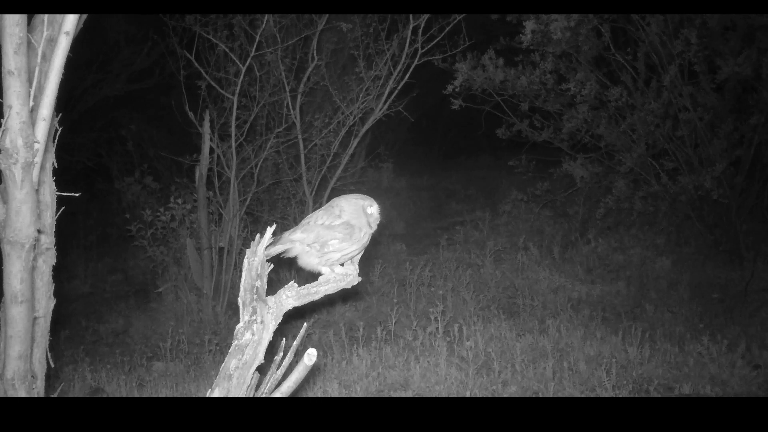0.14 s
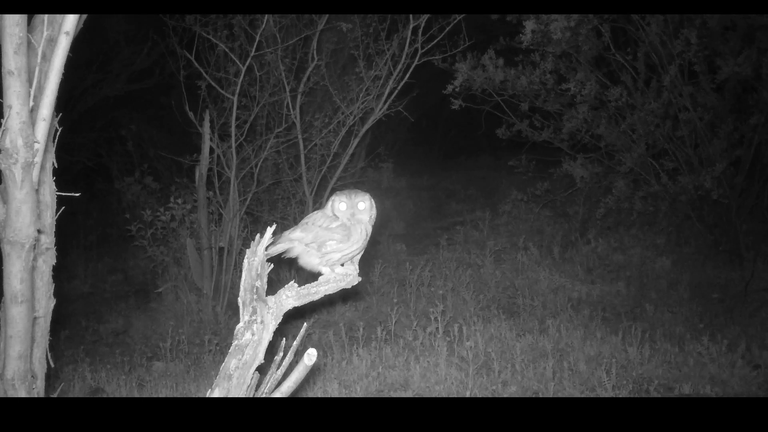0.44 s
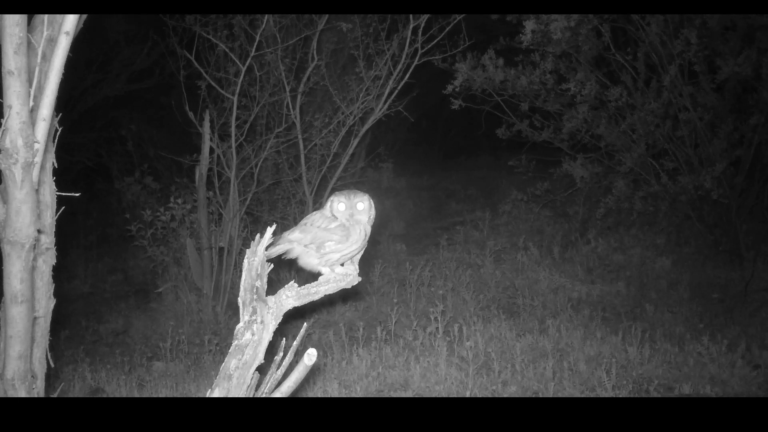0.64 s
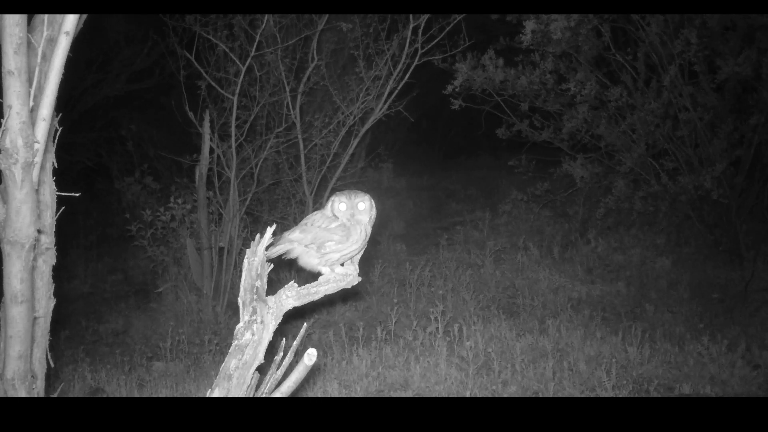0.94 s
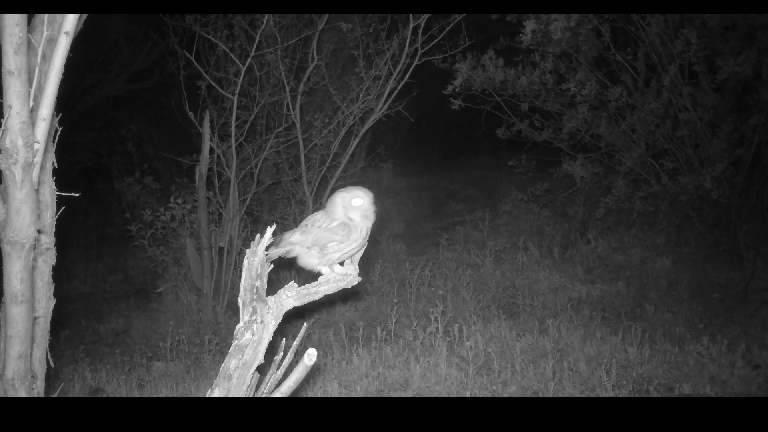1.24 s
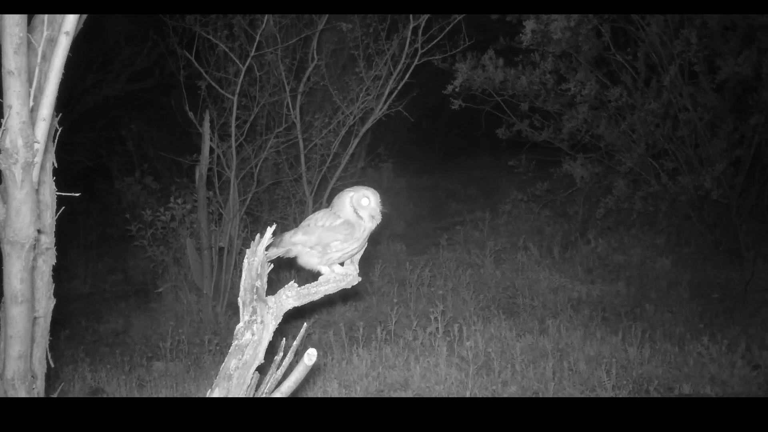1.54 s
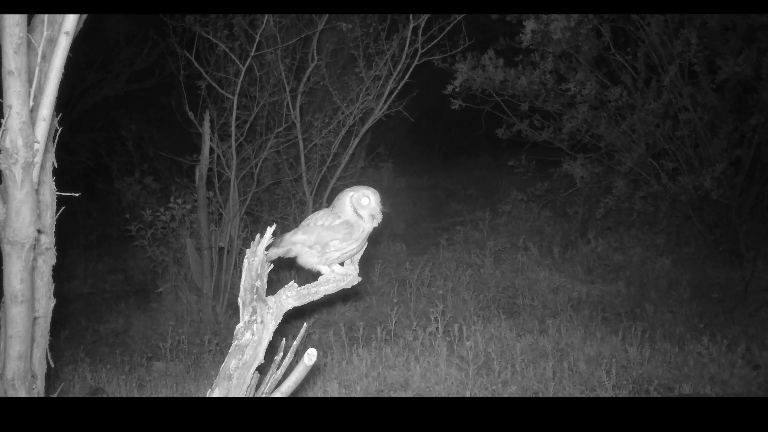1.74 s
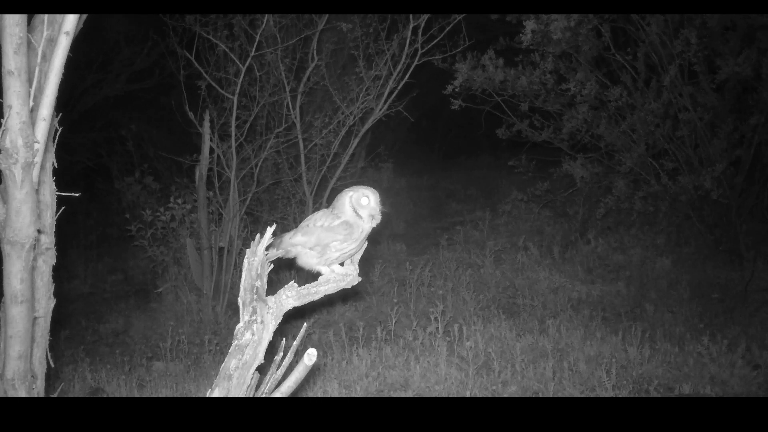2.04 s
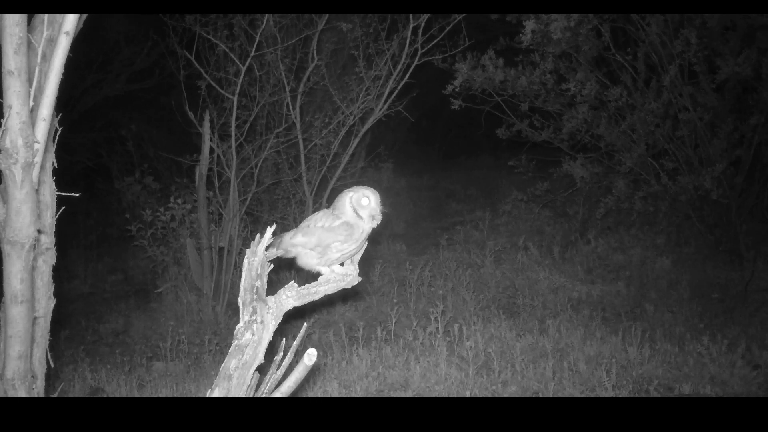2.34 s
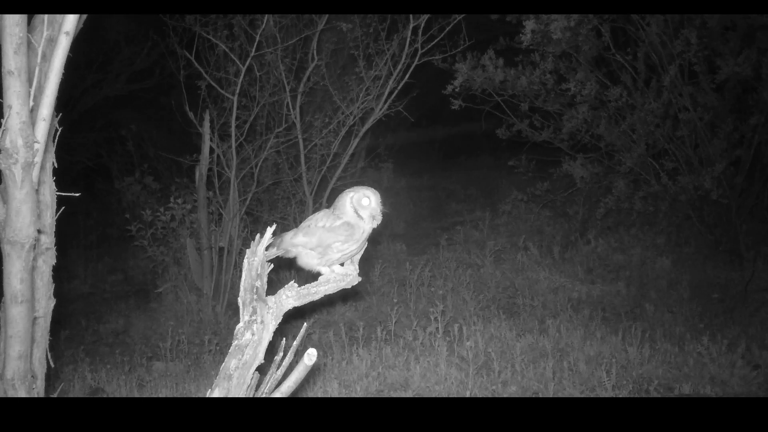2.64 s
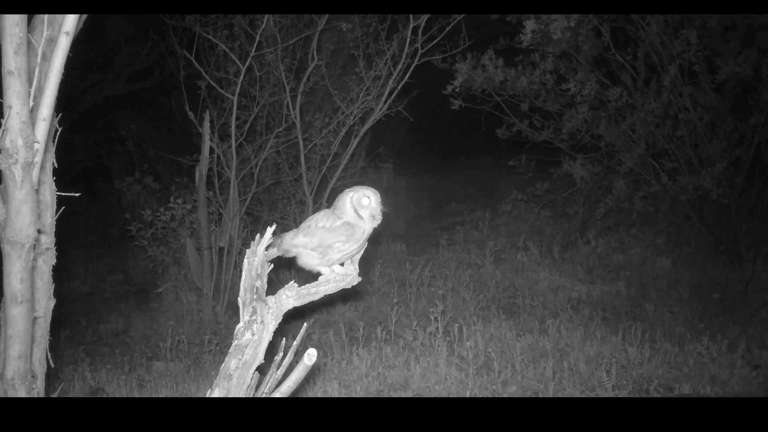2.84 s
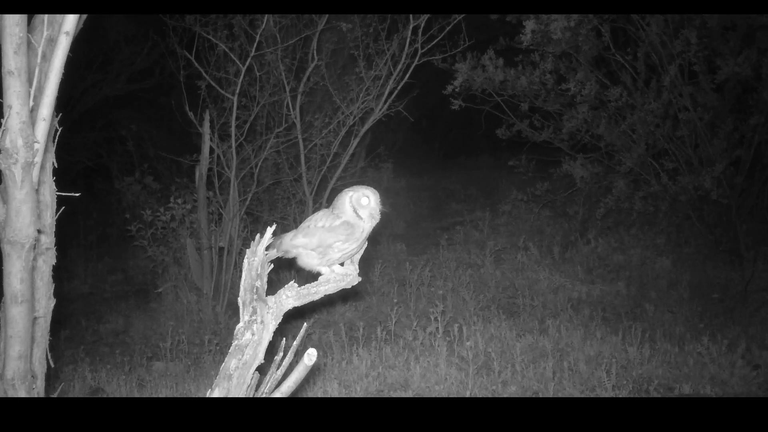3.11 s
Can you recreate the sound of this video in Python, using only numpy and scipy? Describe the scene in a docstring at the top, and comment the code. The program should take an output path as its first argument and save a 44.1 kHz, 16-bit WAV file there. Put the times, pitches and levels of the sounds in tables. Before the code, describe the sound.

An owl trills outdoors at night: after a faint, lower owl's quick hoots, its higher run grows louder, then speeds up and dies away. The microphone adds constant hiss and rumble, with barely audible insects behind.

```python
"""Garden at night. A small owl on the right gives a bouncing trill of short arched hoots that speeds up and
fades; a lower, fainter owl calls too, starting before it. Each hoot is a near-pure tone plus its octave,
scattered briefly by shrubs. Insects rasp faintly in a narrow treble noise band, over steady equipment hiss and
churning rumble."""
import sys
import numpy as np
from scipy import signal
from scipy.fft import rfft, irfft, next_fast_len
from scipy.io import wavfile
from scipy.ndimage import map_coordinates

SR = 44100
rng = np.random.default_rng(int(sys.argv[2]) if len(sys.argv) > 2 else 0)


def to_wav(sig):
    """Store sig (one row per channel, or 1-D mono) as 16-bit WAV at the path in sys.argv[1].

    Samples outside -1..1 are clipped; the rate is SR.
    """
    pcm = np.clip(np.atleast_2d(sig), -1, 1) * 32767
    pcm = np.round(pcm).astype(np.int16)
    wavfile.write(sys.argv[1], SR, pcm.T)  # frames by channels


N = 144207
T = np.arange(N) / SR

# Noise floor spectrum: f/Hz, relative density/dB
HISS_SPECTRUM = [(2, -0.5), (20, -4), (33, -11), (64, -12.5), (118, -18.5), (230, -25), (430, -29.5),
                 (800, -32.5), (1700, -36), (4000, -39), (9000, -41), (15000, -42)]
# Noise floor stereo image: f/Hz, left-right correlation/1
HISS_CORRELATION = [(40, 0.028), (130, 0.16), (300, 0.31), (1400, .4), (15000, 0.34)]
# Nearer insect rasps: centre t/s, length/s, level/dB
INSECT_RASPS = [(.29, .05, -76), (.54, .04, -76), (0.923, 0.087, -76), (1.437, 0.051, -71),
                (1.967, 0.048, -75), (2.48, .05, -76), (2.643, 0.064, -72), (3.25, .08, -72)]
# Low owl: start t/s, length/s, level/dB, f/Hz
LOW_HOOTS = [(0.035, 0.025, -64.5, 518), (0.114, 0.022, -58.5, 526), (0.175, 0.029, -57, 531),
             (0.24, 0.026, -58.5, 527), (0.3, 0.028, -60, 532), (0.352, 0.032, -59.5, 528),
             (0.413, 0.026, -59.5, 527.4), (0.468, 0.032, -62, 516), (0.531, 0.022, -61.5, 533),
             (0.589, 0.021, -60.3, 523.4), (0.646, 0.022, -60.5, 524), (0.704, 0.025, -66, 514),
             (1.007, 0.034, -56, 544), (1.101, 0.042, -58, 545), (1.195, 0.038, -57, 542),
             (1.292, 0.044, -59, 540), (1.383, 0.041, -58, 542), (1.48, 0.039, -57.5, 543.6),
             (1.571, 0.035, -55.5, 541.4), (1.657, 0.039, -59, 544), (1.75, 0.033, -57.5, 537),
             (1.821, 0.026, -57.6, 534), (1.869, 0.037, -62, 517), (1.924, 0.049, -65, 488)]
# High owl: start t/s, length/s, level/dB, top f/Hz, time to top/s, attack/s, rise to top/Hz, end sag/Hz
HIGH_HOOTS = [(0.8884, 0.0502, -55.7, 735.0, 0.0221, 0.026, 89.0, 169.0),
              (0.992, 0.0357, -49.2, 832.0, 0.0157, 0.0044, -23.0, 221.0),
              (1.0683, 0.0491, -47.7, 857.0, 0.0275, 0.026, 193.0, 234.0),
              (1.1548, 0.0443, -48.9, 840.0, 0.0229, 0.0173, 165.0, 301.0),
              (1.2434, 0.0345, -48.4, 844.0, 0.0158, 0.0041, 90.0, 278.0),
              (1.3257, 0.0234, -51.7, 754.0, 0.0081, 0.0032, -2.0, 185.0),
              (1.404, 0.0169, -57.1, 683.0, 0.001, 0.0043, -120.0, 99.0),
              (1.544, 0.0408, -44.5, 855.0, 0.0177, 0.0029, 124.0, 247.0),
              (1.6364, 0.0481, -42.0, 880.0, 0.0224, 0.0077, 91.0, 262.0),
              (1.7365, 0.0496, -42.4, 859.0, 0.0238, 0.0072, 99.0, 225.0),
              (1.8391, 0.0485, -41.6, 871.0, 0.0245, 0.0054, 104.0, 239.0),
              (1.9432, 0.0487, -41.1, 884.0, 0.0259, 0.0047, 109.0, 249.0),
              (2.0447, 0.0449, -40.6, 866.0, 0.0204, 0.004, 95.0, 233.0),
              (2.1457, 0.0439, -41.1, 882.0, 0.0178, 0.0035, 123.0, 239.0),
              (2.2444, 0.0413, -41.2, 858.0, 0.017, 0.0036, 119.0, 216.0),
              (2.3424, 0.0367, -40.7, 879.0, 0.0143, 0.0029, 142.0, 254.0),
              (2.4321, 0.0361, -39.8, 891.0, 0.0177, 0.0064, 106.0, 259.0),
              (2.5127, 0.0306, -41.2, 873.0, 0.0142, 0.0035, 132.0, 271.0),
              (2.5705, 0.0376, -42.4, 859.0, 0.0221, 0.0176, 215.0, 239.0),
              (2.6372, 0.0405, -43.6, 850.0, 0.0233, 0.0221, 242.0, 212.0),
              (2.7009, 0.0366, -45.2, 805.0, 0.0223, 0.0256, 178.0, 163.0),
              (2.7667, 0.037, -47.7, 802.0, 0.0213, 0.026, 251.0, 155.0),
              (2.8342, 0.0286, -55.4, 730.0, 0.0158, 0.0058, 81.0, 215.0)]
# DC drift: t/s, left/full scale, right/full scale
DC_DRIFT = [(0, -.022, -.010), (.6, -.027, -.015), (1.3, -.030, -.018), (2.3, -.033, -.022),
            (3.3, -.034, -.023)]


def amp(db):
    """dB to amplitude."""
    return 10 ** (np.asarray(db) / 20)


def unit(x):
    """Scale to unit RMS."""
    return x / np.sqrt(np.mean(x ** 2) + 1e-20)


def pan(x, left_db, right_db):
    """Stereo with a gain per side."""
    return amp([[left_db], [right_db]]) * x


def log_interp(points, hz):
    """Interpolate (f/Hz, value) points on a log frequency axis."""
    f, value = np.transpose(points)
    return np.interp(np.log(hz + 1), np.log(f + 1), value)


def wobble(rate_hz):
    """Smooth random curve through Gaussian knots at rate_hz."""
    return map_coordinates(rng.standard_normal(int(N * rate_hz / SR) + 4), [T * rate_hz])


def filtered(x, response):
    """FFT filter with gain response(f/Hz)."""
    size = next_fast_len(N + SR // 2)
    return irfft(rfft(x, size) * response(np.fft.rfftfreq(size, 1 / SR)), size)[..., :N]


def hiss(level_db=-50.5, rumble_hz=244, churn_db=1.5):
    """Equipment noise, partly common to both sides; its bass wanders in level."""
    def mid_side_gains(hz):
        angle = np.arccos(log_interp(HISS_CORRELATION, hz)) / 2
        return amp(log_interp(HISS_SPECTRUM, hz)) * [np.cos(angle), np.sin(angle)]

    mid, side = filtered(rng.standard_normal((2, N)), mid_side_gains)
    noise = unit(np.array([mid + side, mid - side]))
    rumble = filtered(noise, lambda hz: 1 / (1 + (hz / rumble_hz) ** 4))
    churn = amp(churn_db * np.array([wobble(3.5), wobble(3.5)]))
    return amp(level_db) * pan(noise + (churn - 1) * rumble, left_db=-.17, right_db=.28)


def insects(centre_hz=6700, width_hz=1270, chorus_db=-80.5, swing_db=1.5):
    """Narrow-band rasp: a randomly swelling chorus plus a few nearer bursts."""
    power = amp(chorus_db + swing_db * wobble(12)) ** 2
    for centre_s, length_s, db in INSECT_RASPS:
        power += amp(db) ** 2 * np.exp(-(2 * (T - centre_s) / length_s) ** 4)
    band = lambda hz: np.exp(-2 * ((hz - centre_hz) / width_hz) ** 2)
    rasp = unit(filtered(rng.standard_normal(N), band))
    return pan(np.sqrt(power) * rasp, left_db=-4, right_db=2)


def shrub_scatter(x, level_db=-25, t60_s=.13, delay_s=.004):
    """Short diffuse echo off shrubs, different on each side."""
    t = T[:SR // 4]
    tail = rng.standard_normal((2, len(t))) * amp(-60 * t / t60_s) * (t > delay_s)
    tail /= np.linalg.norm(tail, axis=1)[:, None]
    return amp(level_db) * signal.fftconvolve(x, tail, axes=1)[:, :N]


def owl_voice(hz, gain, octave_ratio, waver_hz=3, waver_db=.4):
    """Slightly unsteady sine plus a weaker octave."""
    phase = 2 * np.pi * np.cumsum(hz + waver_hz * wobble(120)) / SR
    tone = np.sin(phase) + octave_ratio * np.sin(2 * phase)
    return gain * amp(waver_db * wobble(90)) * tone


def low_owl():
    """Soft, nearly level hoots that droop at the end and reach the left side later."""
    rise_share, sag_share_per_s = .015, 1.6
    attack_db, fade_db, margin_s, left_lag_s = 9, 7.5, .008, .00021
    long_hoot_s, long_octave_db, octave_db_per_s = .043, -7.5, 500  # long hoots are richer
    hz, gain, octave_db = np.zeros((3, N))
    for start_s, length_s, db, pitch_hz in LOW_HOOTS:
        span = slice(round((start_s - margin_s) * SR), round((start_s + length_s + margin_s) * SR))
        position = 2 * (T[span] - start_s) / length_s - 1  # -1 at start, +1 at end
        early, late = np.clip(-position, 0, 2), np.clip(position, 0, 2)
        hz[span] = pitch_hz * (1 - rise_share * early ** 2 - sag_share_per_s * length_s * late ** 3)
        gain[span] = amp(db - attack_db * early ** 4 - fade_db * late ** 3)
        octave_db[span] = long_octave_db + octave_db_per_s * min(length_s - long_hoot_s, 0)
    voice = owl_voice(hz, gain, amp(octave_db))
    delay_left = lambda f: np.exp(-2j * np.pi * f * np.array([[left_lag_s], [0]]))
    return pan(filtered(voice, delay_left), left_db=-2.2, right_db=4)


def high_owl():
    """Each hoot opens, arches to its top pitch, sags as it fades, then closes."""
    flick_hz, flick_s, hard_attack_s = 250, .002, .014  # a hard start overshoots in pitch
    swell_db, fade_db = 5, 12  # loss before and after the top
    close_s, close_db_per_s = .0031, 2800
    lead_s, lead_width_s, lead_db = .0094, .0023, -19
    full_voice_db, full_octave_db = -41.5, -28
    hz, gain = np.zeros((2, N))
    for start_s, length_s, db, top_hz, top_s, attack_s, rise_hz, sag_hz in HIGH_HOOTS:
        span = slice(round(start_s * SR), round((start_s + length_s + .01) * SR))
        t = T[span] - start_s
        early = np.clip(1 - t / top_s, 0, 1)
        late = np.clip((t - top_s) / (length_s - top_s), 0, 1.4)
        overshoot_hz = flick_hz * max(1 - attack_s / hard_attack_s, 0) * np.exp(-t / flick_s)
        hz[span] = top_hz - rise_hz * early ** 2 - sag_hz * late ** 1.8 + overshoot_hz
        opening = np.sin(np.pi / 2 * np.clip(t / attack_s, 0, 1))
        closing = amp(-close_db_per_s * np.clip(t - length_s + close_s, 0, 1))
        gain[span] = opening * closing * amp(db - swell_db * early ** 1.5 - fade_db * late ** 2)
        if attack_s < .01 and rise_hz > 50:  # faint false start ahead of a hard, arched hoot
            lead = slice(round((start_s - .016) * SR), span.start)
            hz[lead] = top_hz
            gain[lead] = amp(db + lead_db) * np.exp(-((T[lead] - start_s + lead_s) / lead_width_s) ** 2)
    octave_ratio = amp(full_octave_db - full_voice_db) * gain  # octave fades twice as fast in dB
    return pan(owl_voice(hz, gain, octave_ratio), left_db=-1.94, right_db=4)


def scene():
    """Two owls and their echo over insects and hiss."""
    owls = high_owl() + low_owl()
    return owls + shrub_scatter(owls) + insects() + hiss()


def record(dry, cutoff_hz=15200):
    """Brick-wall low-pass plus drifting DC offset."""
    times_s, *sides = np.transpose(DC_DRIFT)
    offset = [np.interp(T, times_s, side) for side in sides]
    return filtered(dry, lambda hz: hz < cutoff_hz) + offset


dry = scene()
out = record(dry)
to_wav(out)
```